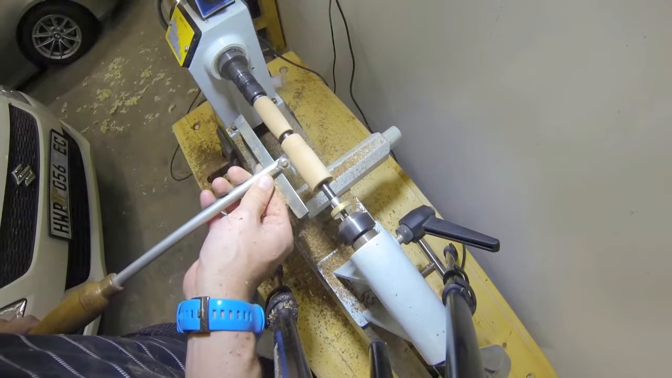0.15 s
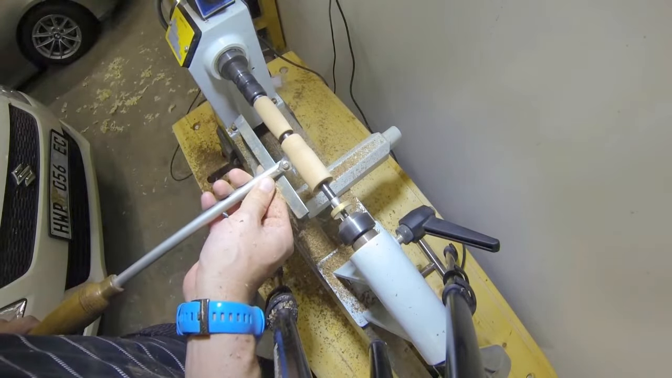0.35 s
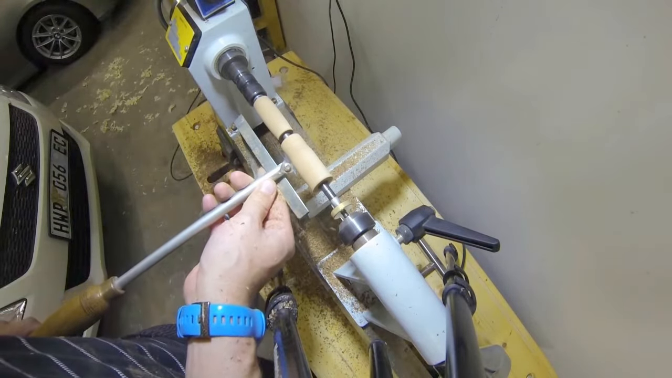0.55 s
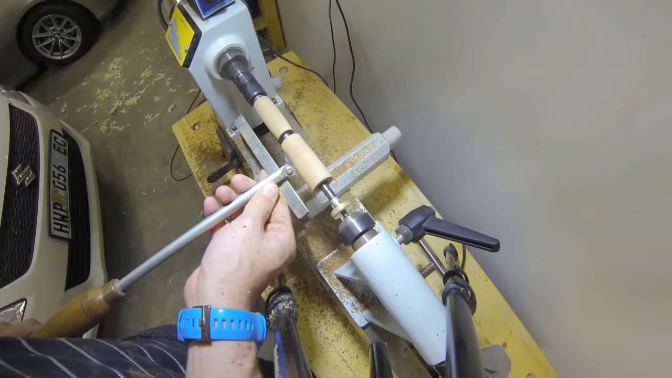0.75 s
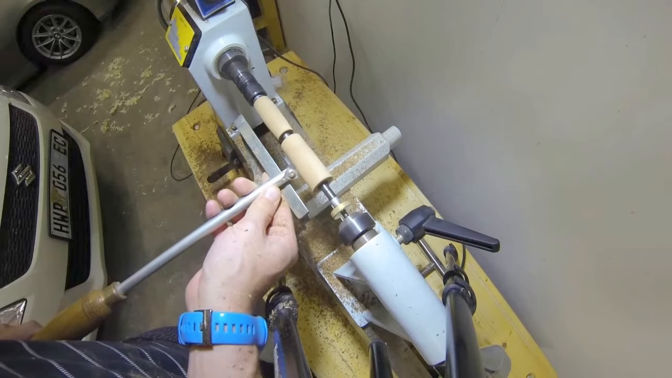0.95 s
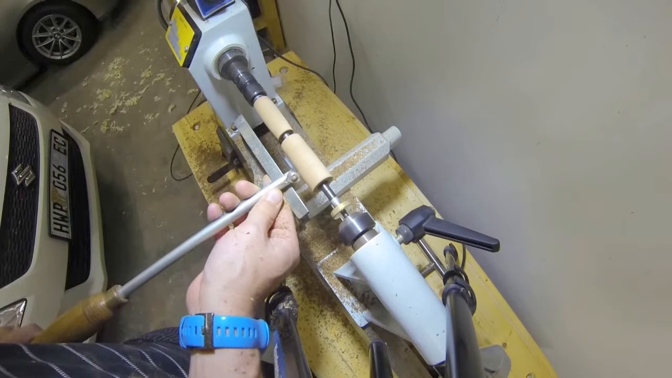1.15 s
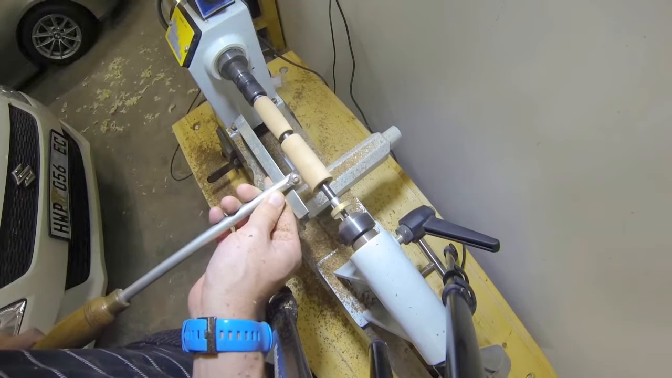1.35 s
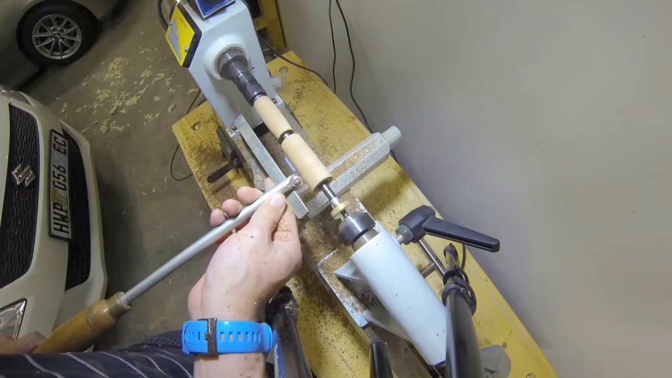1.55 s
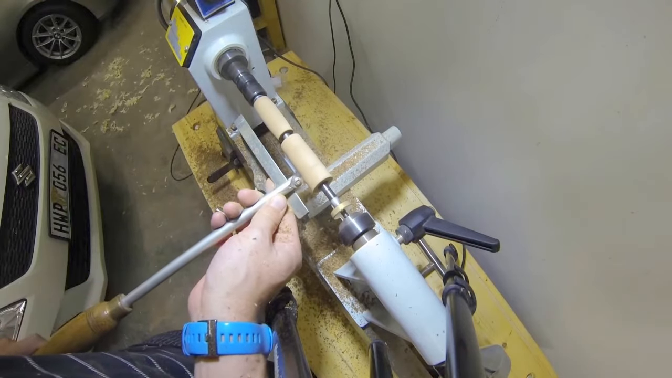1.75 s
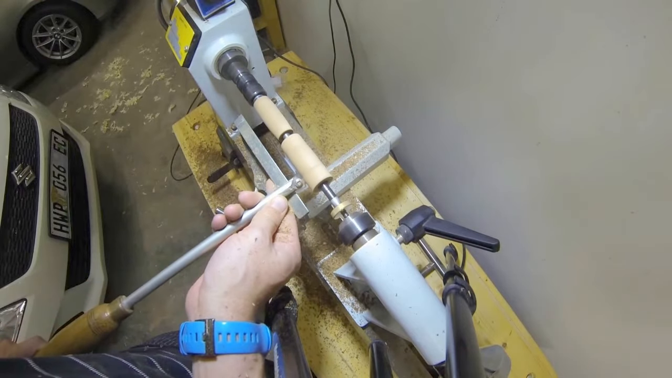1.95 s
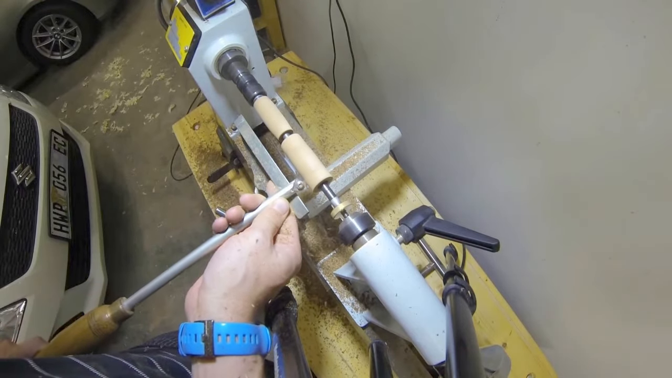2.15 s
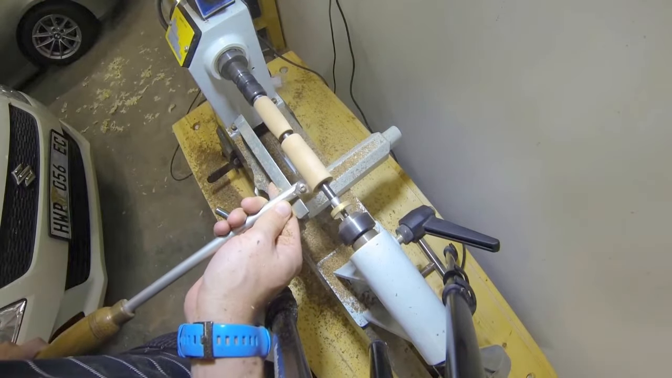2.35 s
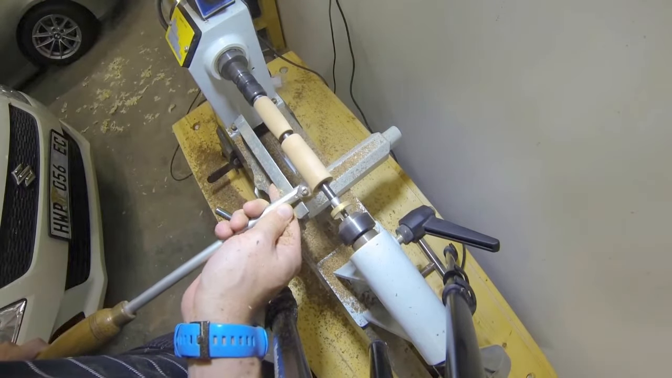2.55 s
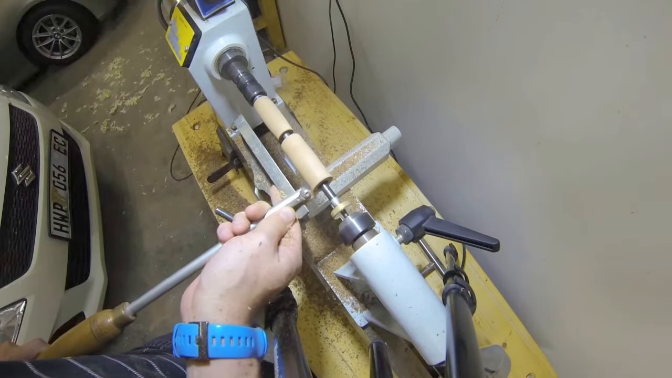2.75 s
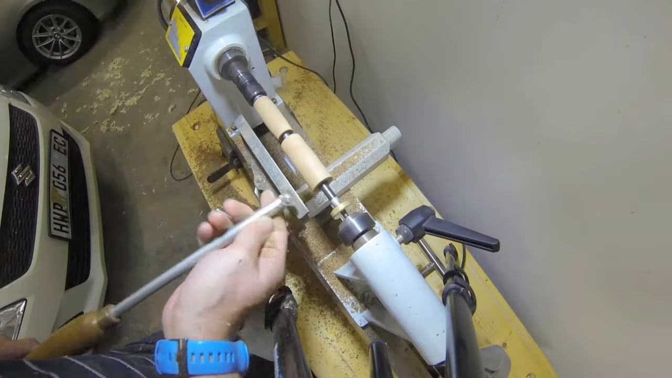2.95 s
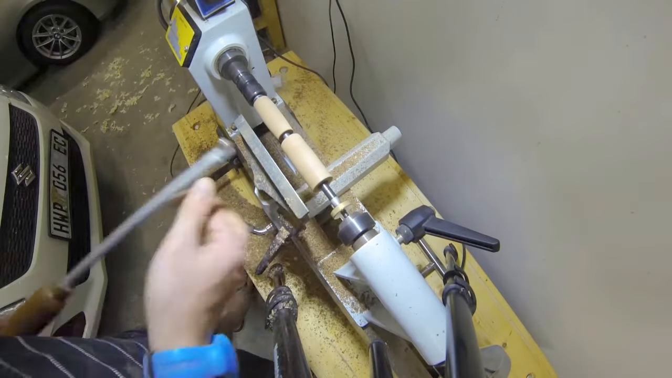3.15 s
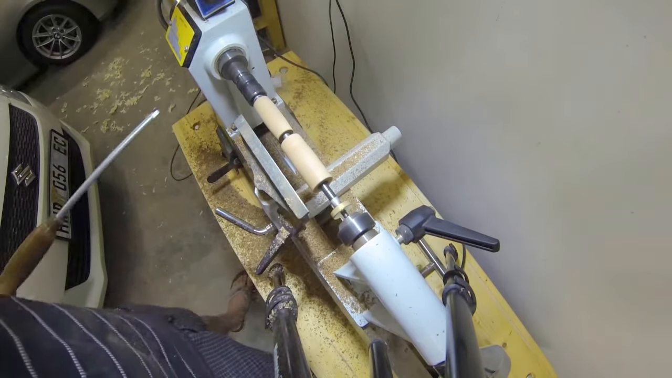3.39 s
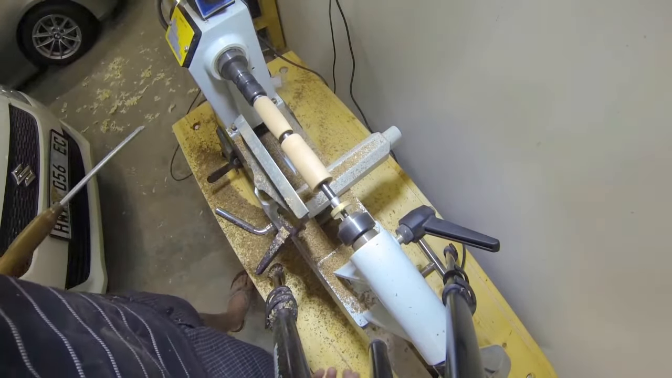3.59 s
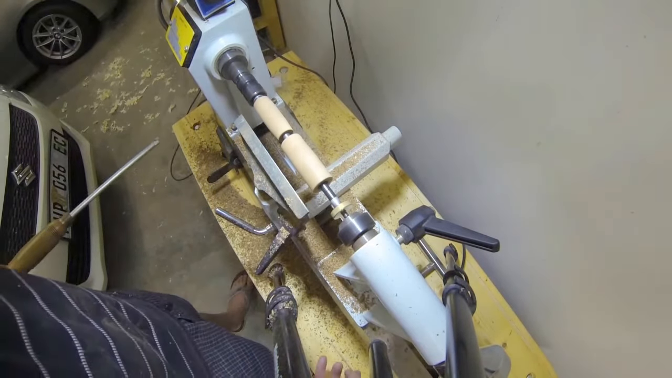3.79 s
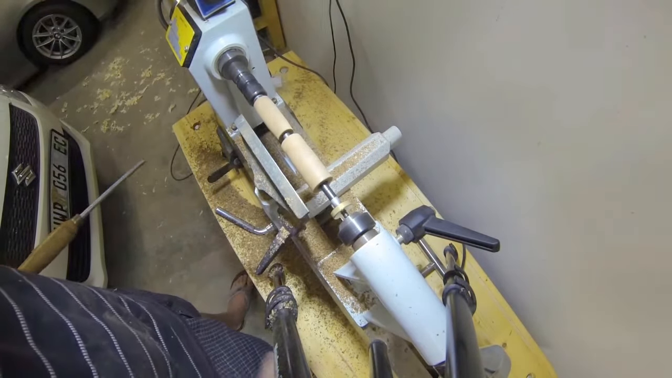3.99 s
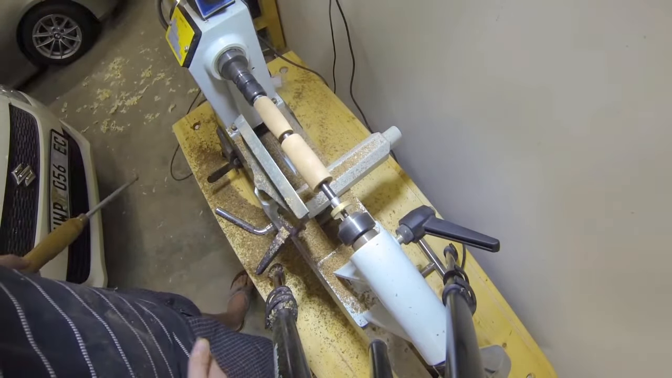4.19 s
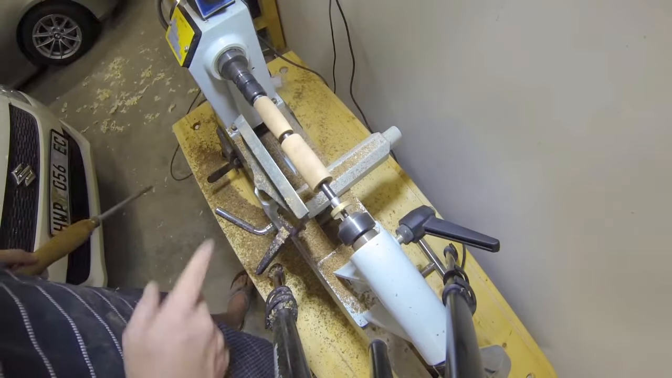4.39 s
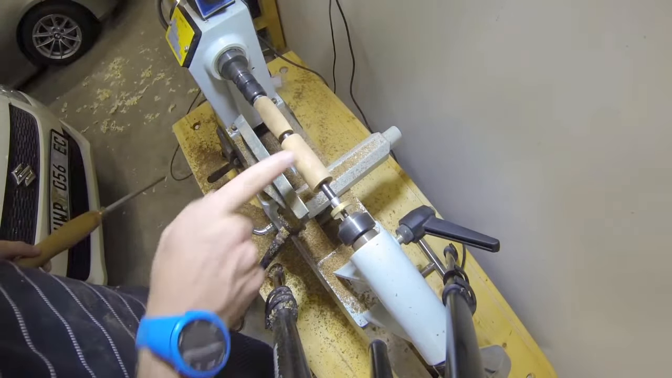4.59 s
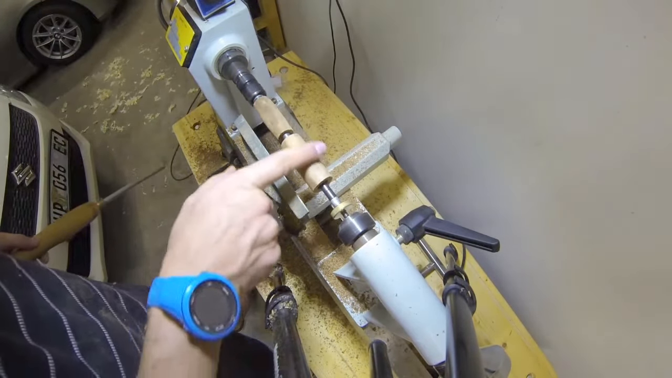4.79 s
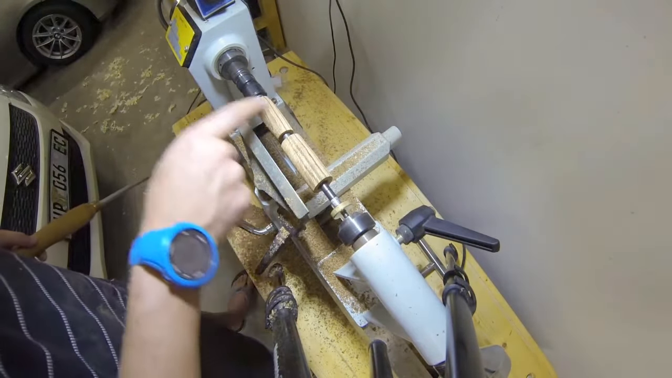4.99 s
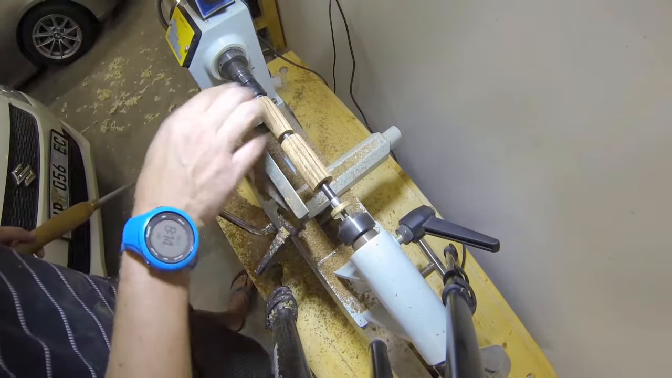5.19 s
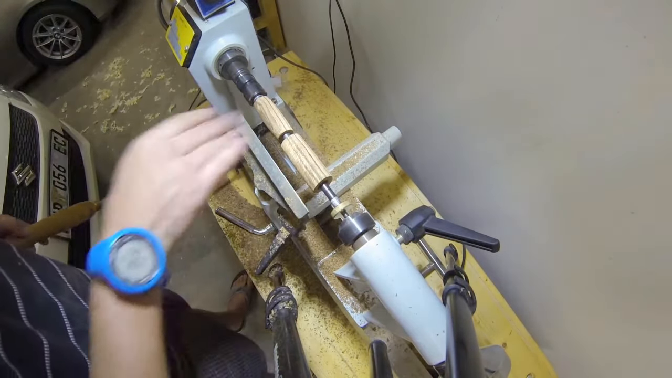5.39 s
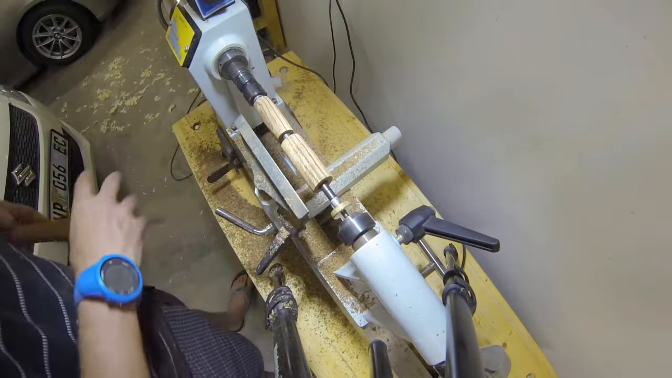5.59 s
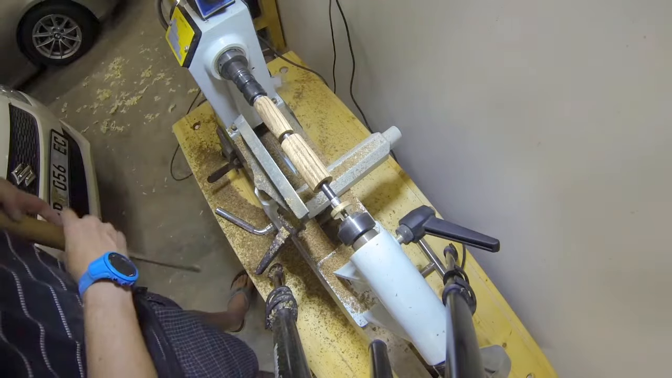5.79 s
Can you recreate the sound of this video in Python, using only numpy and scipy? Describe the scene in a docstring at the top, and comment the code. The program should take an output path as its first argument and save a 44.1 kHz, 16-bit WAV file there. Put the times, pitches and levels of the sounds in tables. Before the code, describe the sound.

Close, mono sound of woodturning: rough grinding squeal with sudden digs, turning thinner, hissier and more ringing as the cut smooths. The tool leaves the wood, the lathe idles steadily for about a second, then a sharp switch click and a falling, fluttering rush. A quiet garage remains, with low rumble, faint hum and a few soft, grainy finger strokes. Bare walls add a short tail.

```python
"""In a garage, a small wood lathe turns a pen blank under a hand-held scraping tool.
The turning wood excites the steel tool into chatter and ringing, and torn fibres hiss as shavings.
The tool lifts off; the lathe, heard as speed-locked tones and bearing noise, idles, is switched off
with a snap and coasts down in a fluttering rush. Grainy noise strokes are fingers brushing the blank;
shaped noise and steady tones make the low rumble and hum of the room."""
import sys
import numpy as np
from scipy import signal
from scipy.fft import rfft, irfft, next_fast_len
from scipy.io import wavfile
from scipy.ndimage import uniform_filter1d, map_coordinates

SR = 44100
rng = np.random.default_rng(int(sys.argv[2]) if len(sys.argv) > 2 else 0)


def pcm_store(signal):
    """Save signal as 16-bit PCM."""
    levels = np.round(np.clip(np.atleast_2d(signal), -1, 1) * 32767)
    wavfile.write(sys.argv[1], SR, levels.astype(np.int16).T)


N = 257544
TIME = np.arange(N) / SR  # [s]

LIFT_S = 2.797  # the tool leaves the wood
OFF_S = 3.781  # the switch is thrown
COAST_S = 4.04  # the motor's hiss begins to die and the coasting rush begins

# How hard the hand pushes, as the strength of the tool's shaking: (time [s], level [dB])
PUSH = [(0.0, -20.5), (0.09, -22), (0.8, -26.5), (1.32, -34.5), (1.34, -31), (1.51, -26.5), (1.59, -38),
        (1.61, -26), (1.86, -27.5), (1.93, -37.5), (1.96, -27), (2.46, -39.5), (2.8, -32)]
FIRM_PUSH_DB = -29.5  # an ordinary push
# Depth of the cut, as the strength of the scraping: (time [s], level [dB])
CUT_DEPTH = [(0, -27), (.25, -26), (.35, -26.5), (.82, -30), (.87, -35.5), (1.2, -36), (1.45, -28),
             (1.6, -31.5), (2.25, -33.5), (2.45, -36), (2.8, -34)]
# Share of the cut made on smooth wood with the bevel rubbing: (time [s], share [0-1])
SMOOTH_SHARE = [(0, 0.02), (1.07, 0.01), (1.13, 0.4), (1.7, 0.15), (2.25, 0.85), (2.8, 0.72)]
# The edge digs in: (time [s], extra level [dB], half length of the bell curve [s])
CATCHES = [(.112, 2.5, .014), (.185, 6, .012), (.24, 3, .016), (.5, 3, .015), (.607, 9.5, .011),
           (.747, 6, .016), (.82, 4.5, .014), (1.5, 6, .033), (1.645, 7, .025), (1.757, 8, .02),
           (1.875, 8.5, .02), (1.985, 4, .016), (2.3, 4.5, .025), (2.705, 4.5, .014), (2.79, 3, .025)]
TREMOR_DB = 1.5  # scale of the hand's random unsteadiness
# Response of each part of the cut: level at a firm push, dB gained per dB of push and per dB of
# a catch, extra dB on smooth wood, and rate of fall after the lift
BEND_LAW = dict(db=-30.5, per_push=.85, per_dig=.12, smooth_db=0, lift_db_per_s=113)
TIP_LAW = dict(db=-30.3, per_push=.68, per_dig=.8, smooth_db=-4, lift_db_per_s=200)
RING_LAW = dict(db=-45.5, per_push=.46, per_dig=.75, smooth_db=17.5, lift_db_per_s=224)
CHIPS_LAW = dict(db=-32, per_push=.14, per_dig=.05, smooth_db=.5, lift_db_per_s=421)
SCRAPE_PER_DIG, SCRAPE_LIFT_DB_PER_S = 1, 203  # dB per dB of a catch; fall after the lift
ZING_DB = -4  # the edge's high modes against the shavings
# Resonances of the steel tool: (frequency [Hz], width [Hz], relative level [dB])
BENDING_MODES = [(862, 45, -2), (958, 40, -3), (1070, 55, -1), (1180, 50, -3), (1284, 45, -4),
                 (1500, 60, -8.5), (1615, 70, -7.5)]
TIP_MODES = [(2130, 50, -8), (2255, 80, 0), (2345, 60, -2), (3080, 110, -1.5), (3300, 40, -7)]
RING_MODES = [(4150, 70, -5), (4365, 70, -1), (4680, 80, 1), (5020, 120, 0), (5130, 50, -6)]
EDGE_MODES = [(6100, 60, -4.5), (6970, 260, 5), (8600, 120, 5.5), (9380, 280, 1.5), (9950, 250, -7),
              (11680, 110, -1.5), (12900, 180, 1)]
# Chatter tones and sidebands one spindle turn apart, from two below upwards: relative level [dB]
BEND_TONES = [-9.5, -9, 0.5, -12.5, -21, -24.5, -17, -23.5]
TIP_TONES = [-12.5, -13, -4, 3, -2.5, -9]
# Spectra of the scrape and of coarse and fine shavings: (frequency [Hz], relative level [dB])
SCRAPE_SPECTRUM = [(300, -24.5), (520, 2.5), (680, -8.5), (900, 2), (1350, -3), (1600, -1.5), (1950, 1),
                   (2750, 0.5), (3100, 2), (3550, 2), (4200, 6), (5500, -4.5), (8000, -4), (15000, -36)]
ROUGH_CHIPS = [(3500, -24), (5200, 0.5), (5800, 1), (6500, -3), (7000, 1.5), (7700, -3.5), (8500, -4.5),
               (10500, -2), (13500, -0.5), (15800, -10.5)]
FINE_CHIPS = [(3500, -8), (5200, -4), (6400, -6.5), (7100, -3.5), (7800, -12.5), (8550, -5.5), (9000, -1.5),
              (9800, -1.5), (10800, 1), (11600, -4), (12400, -4.5), (13100, -9.5), (15800, -9.5)]


def cutting(turns):
    """Forced vibration: tearing fibres drive the tool's modes; returns (chatter tones, cut noise)."""
    push_db = curves(PUSH)[0] - FIRM_PUSH_DB
    smooth = np.clip(curves(SMOOTH_SHARE)[0], 0, 1)
    dig_db = sum(db * swell(s, half) for s, db, half in CATCHES)
    dig_db = dig_db + TREMOR_DB * wobble(45)

    def gain(db, per_push, per_dig, smooth_db, lift_db_per_s):
        """Log-linear response: the decibels of push, catch and surface add up."""
        hand_db = per_push * push_db + per_dig * dig_db
        return amp(db + hand_db + smooth_db * smooth + fade(LIFT_S, lift_db_per_s))

    # the tool bounces at its own bending frequency, out of step with the spindle [cycles]
    bounce = 1064 * TIME + .04 * wobble(14) + .015 * wobble(300)
    slaps = unit(amp(5 * np.cos(2 * np.pi * bounce)))
    pressure = contact(turns, depth_db=4.8)
    tearing = unit(slaps * pressure * surface(turns, memory=.78))
    rubbing = unit(pressure * surface(turns, memory=.8))

    # a rubbing bevel damps the chatter and leaves only the noisy resonances
    clean = .8 * (1 - smooth) ** 1.6
    bend_gain, tip_gain = gain(**BEND_LAW), gain(**TIP_LAW)
    bend_squeal = bend_gain * squeal(bounce, turns, BEND_TONES)
    tip_squeal = tip_gain * squeal(2 * bounce, turns, TIP_TONES)
    chatter = np.sqrt(clean) * (bend_squeal + tip_squeal)
    bend = np.sqrt(1 - clean) * band(resonate(rubbing, BENDING_MODES), 750, 2600)
    tip = .62 * band(resonate(tearing, TIP_MODES), 1800, 3500)
    tool = bend_gain * bend + tip_gain * tip

    scrape_db = curves(CUT_DEPTH)[0] + SCRAPE_PER_DIG * dig_db + fade(LIFT_S, SCRAPE_LIFT_DB_PER_S)
    scrape = amp(scrape_db) * coloured(tearing + .18 * rubbing, SCRAPE_SPECTRUM)
    noisy_ring = band(resonate(rubbing, RING_MODES), 3800, 5600)
    ring = gain(**RING_LAW) * (.95 * edge_ring(turns, decay_s=.0016) + .9 * noisy_ring)

    # single fibres snap at uneven strengths
    snaps = surface(turns, memory=.58) * amp(2 * wobble(2500)) * contact(turns, depth_db=3.5)
    # curling shavings keep changing the colour of the hiss
    rough = np.sqrt(1 - smooth) * coloured(snaps, ROUGH_CHIPS)
    fine = np.sqrt(smooth) * shimmer(coloured(snaps, FINE_CHIPS), depth_db=3.5)
    zing = shimmer(band(resonate(snaps, EDGE_MODES), 4900, 13000), depth_db=2)
    shavings = gain(**CHIPS_LAW) * (rough + fine + amp(ZING_DB) * zing)
    return chatter, tool + scrape + ring + shavings


def surface(turns, memory, size=400):
    """Periodic roughness: the texture returns every turn, partly cut anew (size points a turn)."""
    keep = np.clip(memory, 0, .99)
    fresh = rng.standard_normal((int(turns[-1]) + 60, size))
    # a one-pole recursion from each turn to the next; the first 50 turns settle it
    texture = signal.lfilter([1], [1, -keep], fresh, axis=0)[50:]
    return unit(map_coordinates(texture.ravel(), [turns * size]))


def contact(turns, depth_db):
    """Eccentric rotation: an out-of-round part modulates the pressure once a turn, rms 1."""
    return unit(amp(depth_db * np.cos(2 * np.pi * turns)))


def squeal(bounce, turns, sidebands):
    """Modulation sidebands: the turning blank splits a chatter tone into a cluster, rms 1."""
    tones = 0
    for k, db in enumerate(sidebands):
        phase = bounce + (k - 2) * turns + rng.random()
        tones = tones + amp(db + wobble(13)) * np.cos(2 * np.pi * phase)
    return unit(tones)


# The edge's pitch shifts as the contact point slides along it: (time [s], frequency [Hz])
EDGE_PITCH = [(0, 4670), (2.2, 4670), (2.36, 4660), (2.5, 4590), (2.66, 4420), (2.73, 4680), (2.82, 4950)]


def edge_ring(turns, decay_s):
    """Impulse response: a hard spot strikes the edge once a turn and it rings with damping, rms 1."""
    age = (turns + .42) % 1 / 109.1  # seconds since the strike, at the cutting speed
    ping = np.sin(2 * np.pi * curves(EDGE_PITCH)[0] * age + .5 * wobble(70))
    return unit(ping * age * np.exp(-age / decay_s) * amp(2.2 * wobble(60)))


def shimmer(x, depth_db):
    """Time-varying filtering: random gain patches a few hundred Hz wide and some tens of ms long."""
    z = signal.stft(x, nperseg=512)[2]
    field = uniform_filter1d(rng.standard_normal(z.shape), size=7, axis=0)
    field = uniform_filter1d(field, size=14, axis=1)
    return unit(signal.istft(z * amp(depth_db * unit(field)), nperseg=512)[1][:N])


# Rotation of the spindle: (time [s], speed [turns/s])
SPEED = [(0, 109.1), (2.75, 109.1), (2.9, 109.5), (3.785, 109.5), (3.85, 91), (3.89, 79), (3.94, 71),
         (4.0, 64), (4.06, 48), (4.8, 0)]


def spindle_speed():
    """Rotational kinematics: the speed holds nearly steady, then runs down to rest."""
    return curves(SPEED)[0]


# Shaft harmonics 1, 2, 3...:
# (relative level [dB], relative level of the sideband one belt lap higher [dB])
SHAFT = [(-38.5, -44), (-39, -59), (-42.5, -45), (-43, -56.5), (-57.5, -64.5)]
# Motor tones at full speed: (frequency [Hz], relative level [dB])
MOTOR = [(59, -53.5), (236, -46.5), (337, -47), (393, -52), (452.4, -32.5), (471.5, -48.5), (1179, -47),
         (1809, -46.5), (1884, -49.5), (1976, -58.5), (2121, -49), (2212, -41.5), (2681, -51.5)]
FULL_SPEED, BELT_LAPS = 109.5, 58.1  # spindle turns and belt laps per second
POWER_DROP_S, SLACK_DB = .041, 5  # the drive lets go; scale of the slack belt's stutter
WHINE_FADE_S = .24  # the motor's whine dies away
UNLOAD_DB_PER_S = 64  # the load of the cut eases after the lift
BENCH_HZ, BENCH_WIDTH_HZ = 69.4, 4.1  # the spindle rate that shakes the bench
# Machine levels: idling, extra under load, extra unpowered, power of the speed, extra at the bench
# resonance
TONES_LAW = dict(db=-.46, load_db=-1.05, off_db=-4, power=1.8, shudder_db=6.5)
BEARING_LAW = dict(db=-36.5, load_db=1.3, off_db=-.5, power=2.8, shudder_db=5)


def lathe(turns):
    """Order-locked radiation: shaft, belt and motor tones follow the speed, over bearing noise."""
    speed = spindle_speed()
    slowing_db = 20 * np.log10(speed / FULL_SPEED + 1e-6)
    unpowered = np.clip((TIME - OFF_S) / POWER_DROP_S, 0, 1)
    loaded = amp(fade(LIFT_S, UNLOAD_DB_PER_S))
    # slowing down, the spindle passes through the resonance of the bench and shakes it
    shudder = np.exp(-.5 * ((speed - BENCH_HZ) / BENCH_WIDTH_HZ) ** 2)

    def level(db, load_db, off_db, power, shudder_db):
        """Power law of speed: level in dB, corrected for load, drive and resonance."""
        state_db = load_db * loaded + off_db * unpowered
        return db + state_db + power * slowing_db + shudder_db * shudder

    angle = 2 * np.pi * (turns + .0022 * wobble(40))
    belt = angle * BELT_LAPS / FULL_SPEED
    # the shaft's harmonics line up into a soft thump, which the belt makes strong and weak by turns
    thump = 0
    for order, (db, side_db) in enumerate(SHAFT, start=1):
        thump = thump - amp(db) * np.cos(order * angle)
        thump = thump - amp(side_db) * np.cos(order * angle + belt)

    # the motor's tones die after the switch, the high ones first
    run_time = turns / FULL_SPEED
    powered = np.clip(1 - (TIME - OFF_S) / WHINE_FADE_S, 0, 1)
    whine = 0
    for hz, db in MOTOR:
        tone = np.sin(2 * np.pi * hz * run_time + .1 * wobble(25))
        whine = whine + amp(db + wobble(12)) * tone * powered ** (hz / 450)

    # without drive the belt goes slack and the tones stutter
    stutter_db = SLACK_DB * unpowered * wobble(110)
    tones = amp(level(**TONES_LAW) + stutter_db) * np.sqrt(2) * (thump + whine)
    return tones + amp(level(**BEARING_LAW)) * bearings(turns)


# Broad noise of the bearings: (frequency [Hz], relative level [dB])
BEARING_SPECTRUM = [(25, -25.5), (70, -10.5), (200, 0.5), (450, 1), (650, -5), (900, -2.5), (1600, -11.5),
                    (2150, -6.5), (2550, -7), (3100, -22.5), (3500, -16), (7400, -16), (8400, -19.5),
                    (11000, -21.5), (15800, -31)]
# Bearing resonances: (frequency [Hz], width [Hz], relative level [dB])
RACE_MODES = [(3133, 70, 2.5), (4670, 60, -1.5), (6000, 91, -2.5), (7040, 56, -1), (7560, 42, -1.5),
              (9090, 80, -9), (10570, 190, -7.5), (10850, 180, -8), (11520, 190, -11.5), (12750, 300, -9)]


def bearings(turns):
    """Rolling contact noise: balls hiss in their races and ring the housing, modulated once a turn."""
    rolling = rng.standard_normal(N) * contact(turns, depth_db=-1.5)
    return noise(BEARING_SPECTRUM) + amp(-9) * band(resonate(rolling, RACE_MODES), 2800, 14000)


# Resonances of the switch: (frequency [Hz], width [Hz], relative level [dB])
SWITCH_MODES = [(1690, 110, 13), (3085, 130, -7.5), (4430, 390, 6.5), (5600, 790, 0), (7060, 250, -7.5),
                (10850, 3000, -21)]
# Spectra of the motor's hiss and of the coasting rush: (frequency [Hz], relative level [dB])
HISS_SPECTRUM = [(880, -44), (1500, -20.5), (2330, -1.5), (2800, -16), (3030, 6), (3580, -8.5), (5340, -4),
                 (6190, 0), (8050, -10.5), (10600, -13), (15500, -32.5)]
RUSH_SPECTRUM = [(400, -13), (800, 0.5), (960, 5.5), (1150, -2), (1260, -2.5), (1315, 14), (1380, -3),
                 (1750, -2.5), (2200, -1.5), (3300, -11), (5000, -17), (6200, -28), (14000, -30.5)]


def stopping():
    """Transient excitation: the switch snaps, the motor hisses, and a fluttering rush decays."""
    age = TIME - OFF_S
    snap = rng.standard_normal(N) * (age > 0) * amp(-60 * np.abs(age) / .038)  # 60 dB in 38 ms
    hiss_gain = burst(OFF_S, COAST_S - OFF_S, db_per_s=900, db=-46.5)
    rush_gain = burst(COAST_S, hold_s=.18, db_per_s=38, db=-47.2) * amp(.85 * wobble(44))
    switch = amp(-19.5) * resonate(snap, SWITCH_MODES)
    return switch + hiss_gain * noise(HISS_SPECTRUM) + rush_gain * noise(RUSH_SPECTRUM)


# Fingers on the blank: (time [s], level [dB], half length of the bell curve [s])
TOUCHES = [(4.72, -69, .06), (4.872, -58, .025), (4.937, -61, .017), (5.305, -56, .02), (5.341, -53, .011),
           (5.67, -67, .04), (5.785, -64, .022)]
# Colour of skin on wood: (frequency [Hz], relative level [dB])
SKIN_SPECTRUM = [(400, -9), (800, 5), (1500, 1), (2100, 0.5), (3200, -10), (4250, -1), (5300, -7.5),
                 (6500, -5), (9000, -9.5), (11500, -9), (12400, -6), (13500, -13), (15500, -21)]


def fingers():
    """Sliding friction: skin on wood gives short strokes of grainy noise."""
    strokes = sum(amp(db) * swell(s, half) for s, db, half in TOUCHES)
    grain = rng.standard_normal(N) * amp(3.1 * wobble(550))
    return strokes * coloured(grain, SKIN_SPECTRUM)


# Reverberation of the garage: (frequency [Hz], time to fall 60 dB [s])
REVERB_TIMES = [(200, 1), (2000, 0.66), (12000, 0.05)]


def garage(x):
    """Diffuse reverberation: bare walls answer with a short tail that dies sooner in the treble."""
    hz, t, z = signal.stft(rng.standard_normal(SR // 2), SR, nperseg=256)
    decay = amp(-60 * t / along(REVERB_TIMES, hz)[:, None])
    tail = signal.istft(z * decay, SR, nperseg=256)[1]
    delayed = np.pad(tail / np.linalg.norm(tail), (SR // 200, 0))  # 5 ms
    return signal.fftconvolve(x, delayed)[:N]


# Rumble of the room: (frequency [Hz], relative level [dB])
AMBIENCE = [(20, -5), (30, -14), (45, -8), (64, -7), (85, -15), (120, -12.5), (155, -15.5), (260, -23),
            (440, -26.5), (600, -32), (1550, -40), (1850, -33), (2200, -44), (3000, -45.5), (8500, -55),
            (11000, -52), (15000, -71.5)]
# Steady tones of the workshop: (frequency [Hz], level [dB])
HUM = [(393, -65), (441.4, -60.5), (10998, -74)]


def workshop():
    """Background noise floor: uneven low rumble, a faint hum and a thin electrical whistle."""
    hum = 0
    for hz, db in HUM:
        tone = np.sin(2 * np.pi * hz * TIME + .2 * wobble(10))
        hum = hum + amp(db) * np.sqrt(2) * tone
    return amp(-48 + wobble(26)) * noise(AMBIENCE) + hum


def amp(db):
    """Logarithmic level: decibels to amplitude gain."""
    return 10 ** (np.asarray(db) / 20)


def unit(x):
    """Root-mean-square normalisation: scale to rms 1."""
    return x / np.sqrt(np.mean(x ** 2) + 1e-20)


def curves(rows):
    """Linear interpolation: one value per sample for each column after the time."""
    s, *cols = np.transpose(rows)
    return [np.interp(TIME, s, c) for c in cols]


def along(points, hz):
    """Logarithmic frequency scale: (frequency [Hz], value) points read between their knots."""
    f, v = np.transpose(points)
    return np.interp(np.log(hz + 1), np.log(f + 1), v)


def wobble(rate):
    """Band-limited fluctuation: a smooth random curve with rate knots a second."""
    return map_coordinates(rng.standard_normal(int(N * rate / SR) + 4), [TIME * rate])


def filtered(x, response):
    """Linear filtering: the spectrum of x times a response of frequency."""
    m = next_fast_len(N + SR // 4)
    return irfft(rfft(x, m) * response(np.fft.rfftfreq(m, 1 / SR)), m)[:N]


def coloured(x, spectrum):
    """Spectral shaping: x under a spectrum that falls away below its first point, rms 1."""
    def response(f):
        return amp(along(spectrum, f)) * np.minimum(f / spectrum[0][0], 1) ** 2
    return unit(filtered(x, response))


def noise(spectrum):
    """Shaped random noise: white noise given a spectrum, rms 1."""
    return coloured(rng.standard_normal(N), spectrum)


def resonate(x, modes):
    """Modal superposition: x through a parallel set of damped resonances."""
    def response(f):
        return sum(amp(db) * 1j * f * w / (c * c - f * f + 1j * f * w) for c, w, db in modes)
    return filtered(x, response)


def band(x, low_hz, high_hz):
    """Band limitation: a steep band-pass, rms 1."""
    def response(f):
        return 1 / np.sqrt((1 + (low_hz / (f + 1)) ** 10) * (1 + (f / high_hz) ** 10))
    return unit(filtered(x, response))


def swell(s, half):
    """Gaussian envelope: a bell-shaped rise and fall around time s."""
    return np.exp(-.5 * ((TIME - s) / half) ** 2)


def fade(start_s, db_per_s):
    """Exponential decay: 0 dB until start_s, then a steady fall in dB."""
    return -db_per_s * np.maximum(TIME - start_s, 0)


def burst(start_s, hold_s, db_per_s, db):
    """Attack and exponential decay: a gain that rises in 15 ms, holds and dies away."""
    return np.clip((TIME - start_s) / .015, 0, 1) * amp(db + fade(start_s + hold_s, db_per_s))


def scene():
    """Superposition: the sources add, and everything that spins shares the spindle's angle."""
    turns = np.cumsum(spindle_speed()) / SR
    chatter, cut = cutting(turns)
    near = cut + stopping() + fingers()
    # chatter and lathe are heard directly; the near noises also come back from the walls
    echoes = amp(-9.5) * garage(near)
    return (chatter + near + echoes + lathe(turns) + workshop())[None]


def record(dry):
    """Soft saturation and band limitation: high peaks are rounded, then the top is cut off."""
    rounded = dry[0] / (1 + np.abs(dry[0] / .62) ** 4) ** .25
    return filtered(rounded, lambda hz: hz < 15750)[None]


dry = scene()
out = record(dry)
pcm_store(out)
```